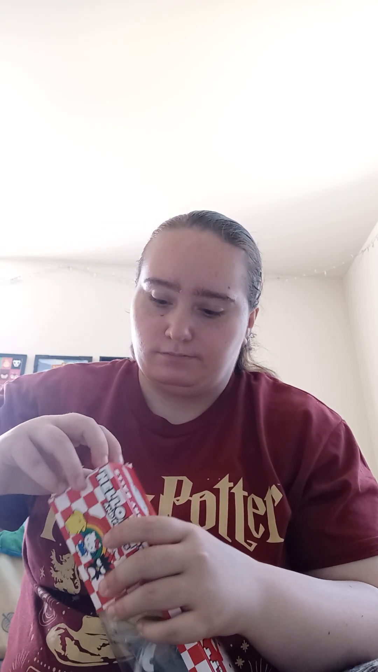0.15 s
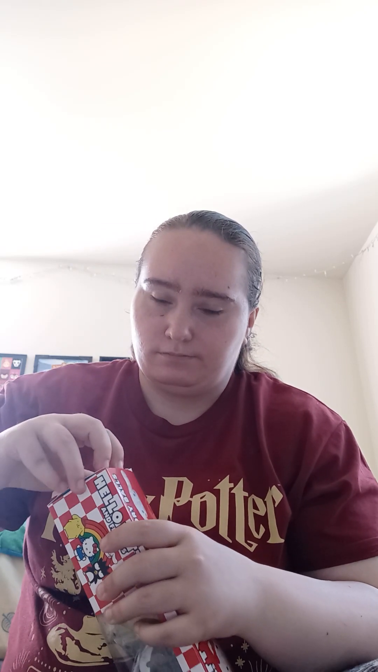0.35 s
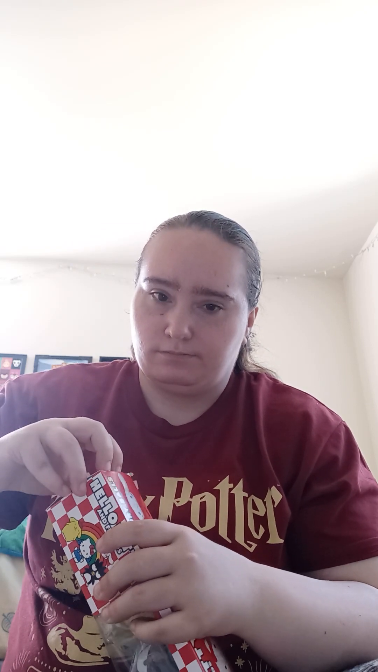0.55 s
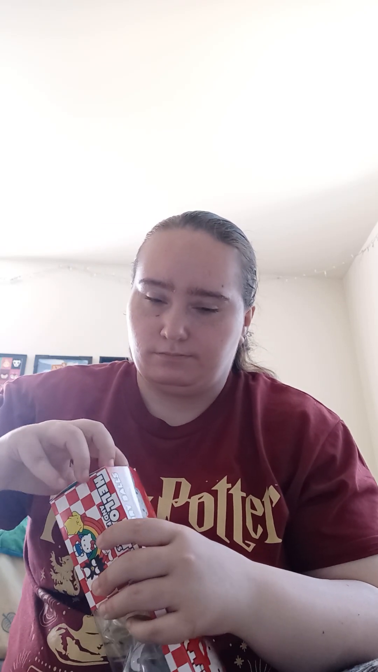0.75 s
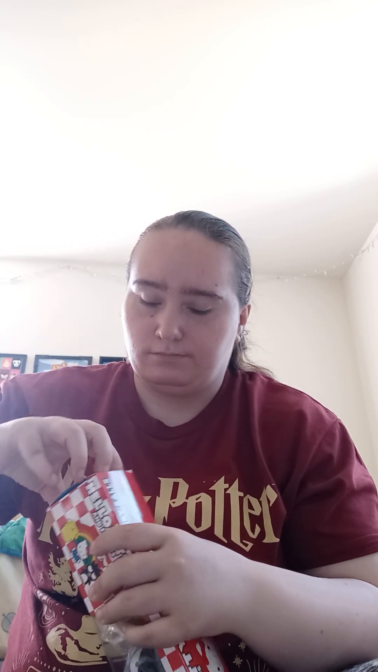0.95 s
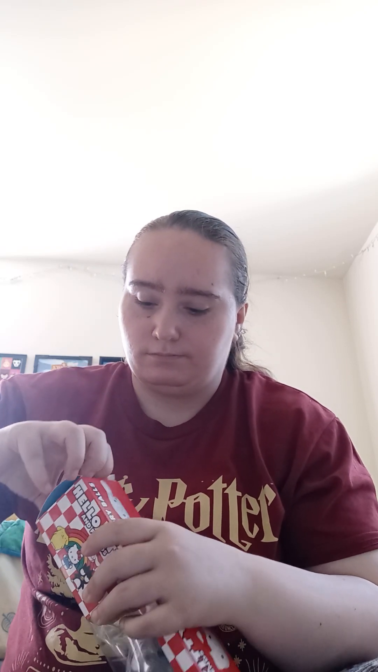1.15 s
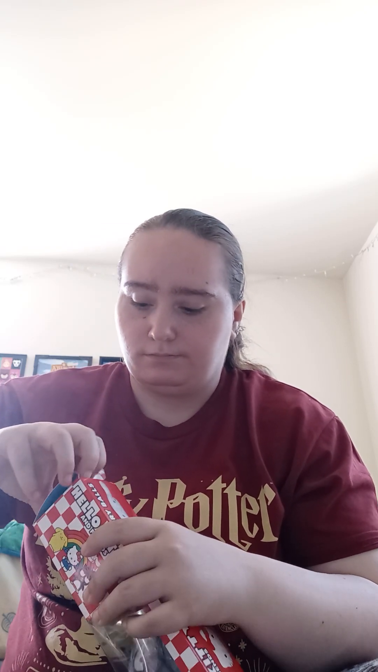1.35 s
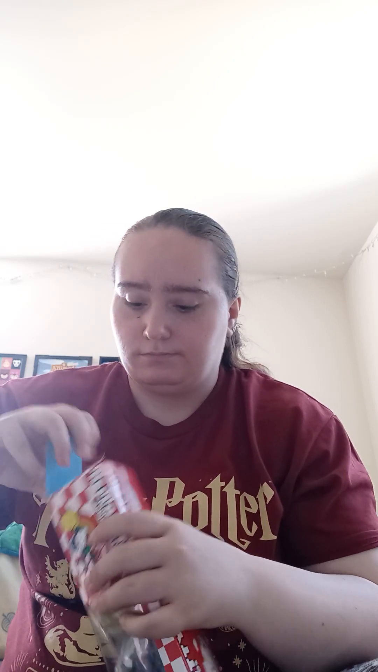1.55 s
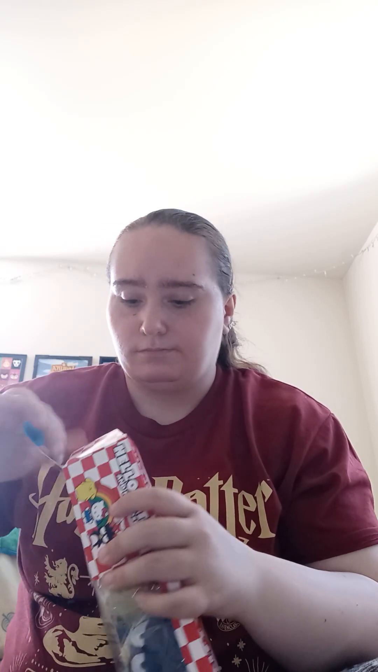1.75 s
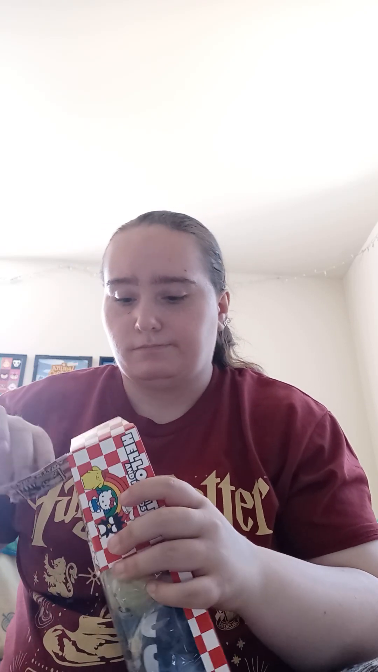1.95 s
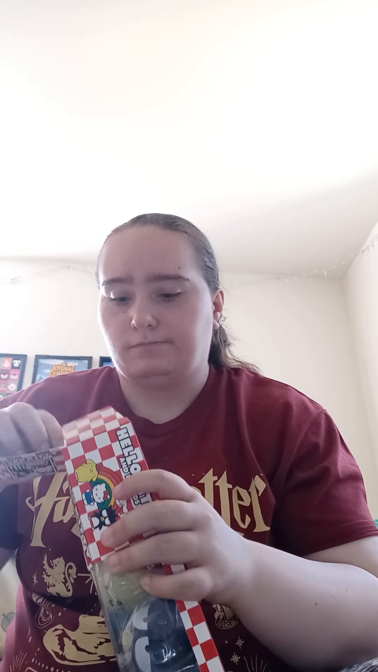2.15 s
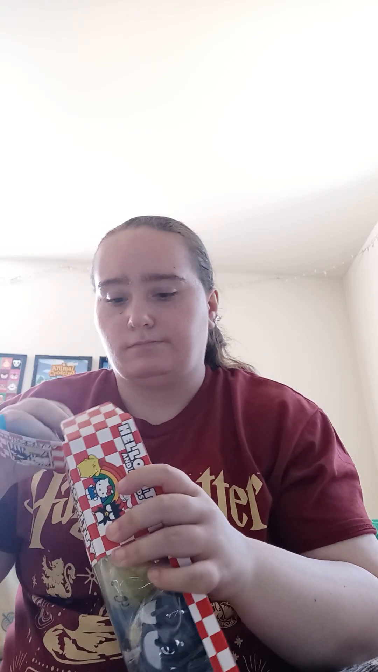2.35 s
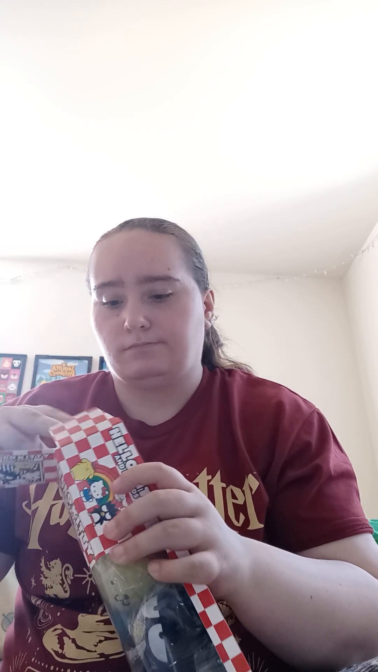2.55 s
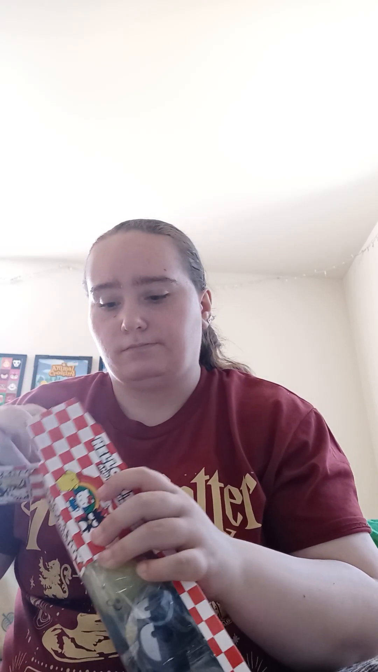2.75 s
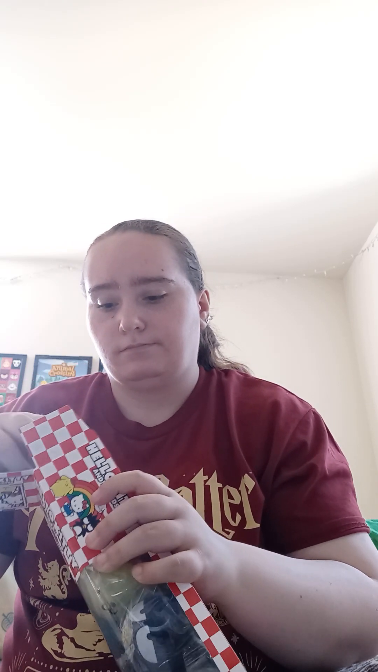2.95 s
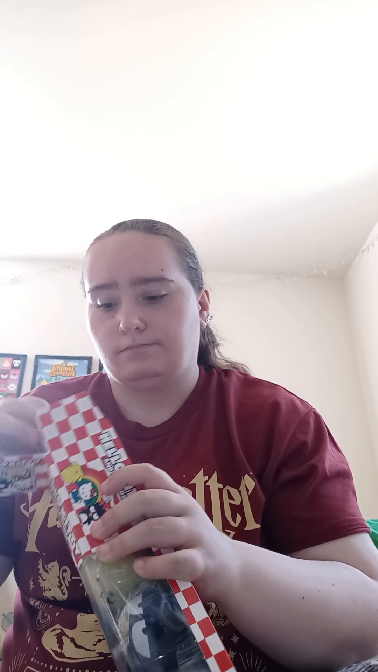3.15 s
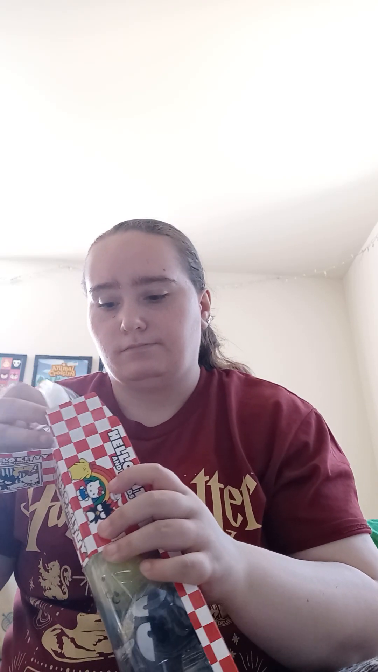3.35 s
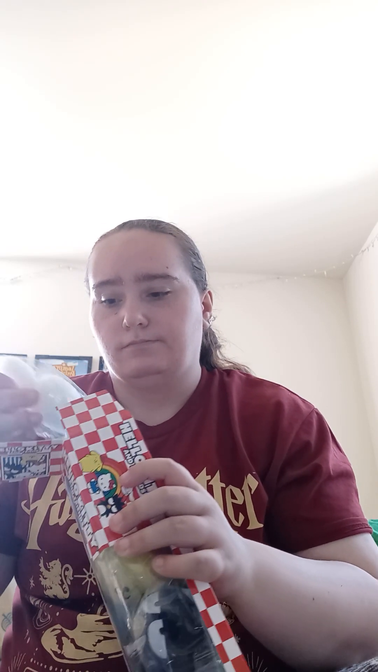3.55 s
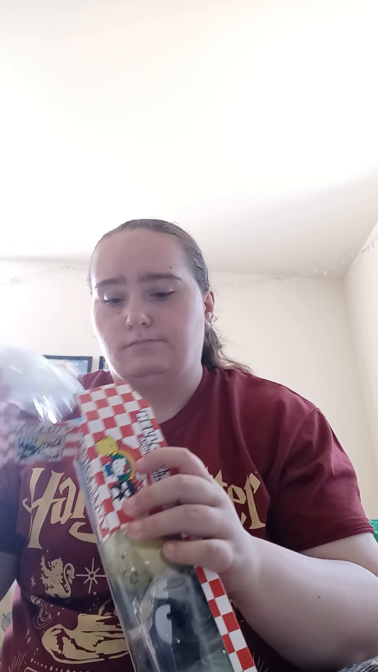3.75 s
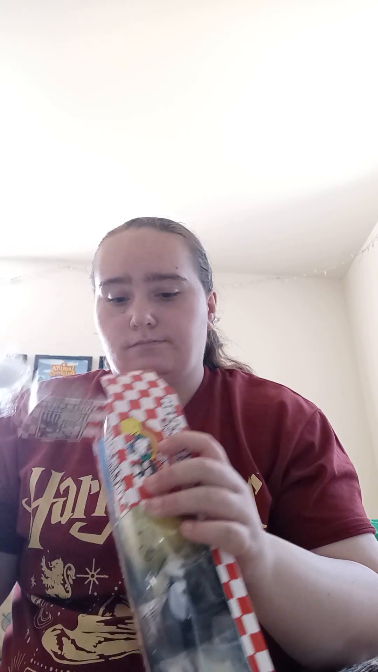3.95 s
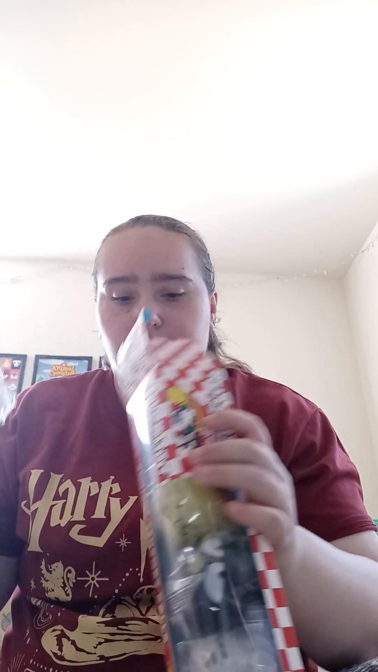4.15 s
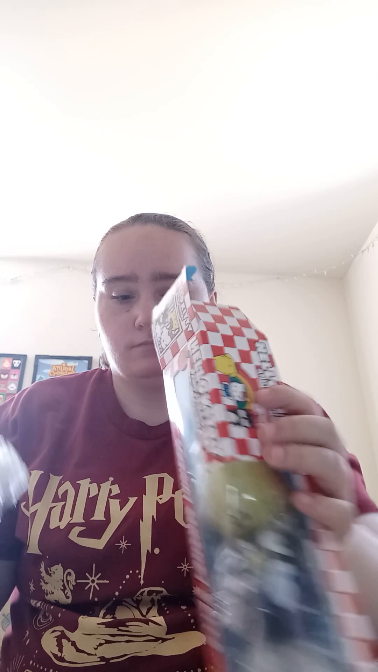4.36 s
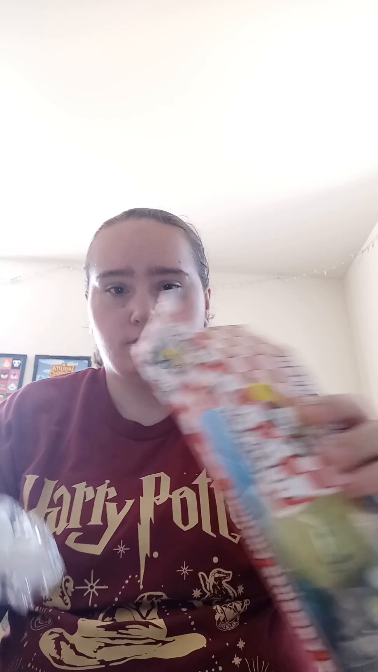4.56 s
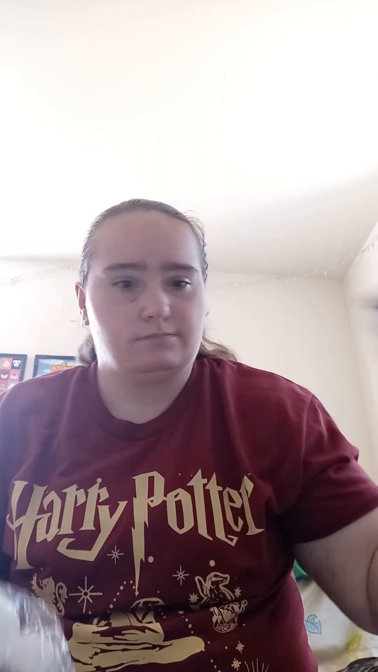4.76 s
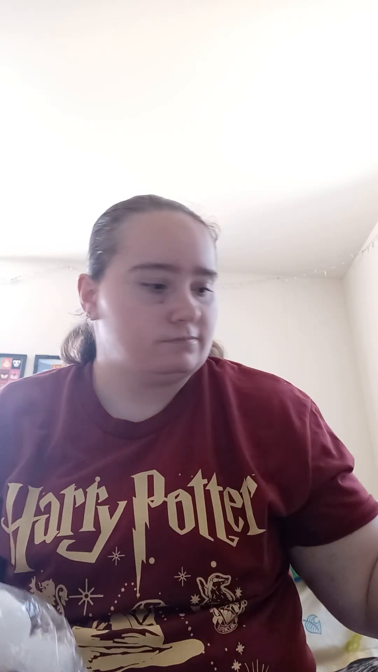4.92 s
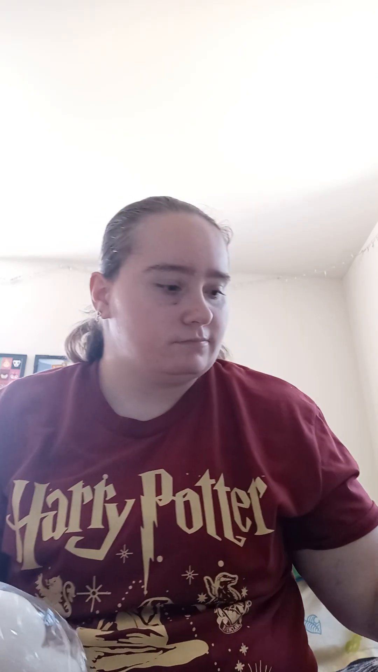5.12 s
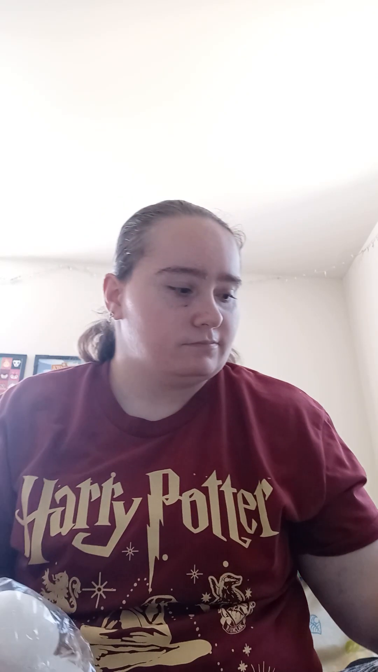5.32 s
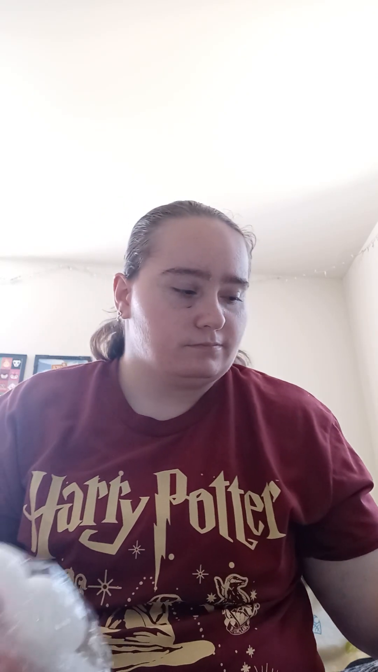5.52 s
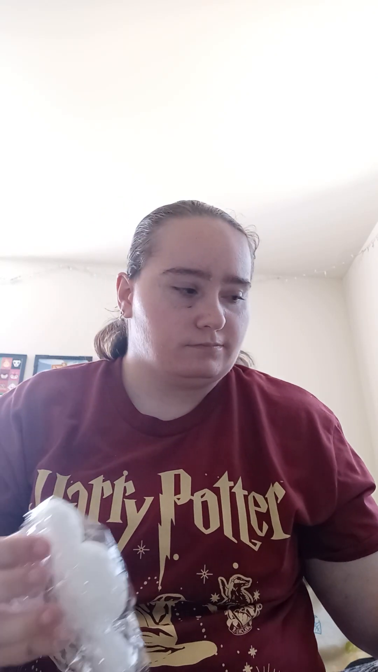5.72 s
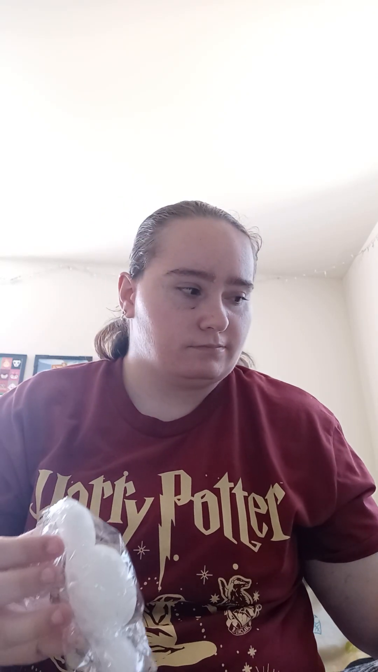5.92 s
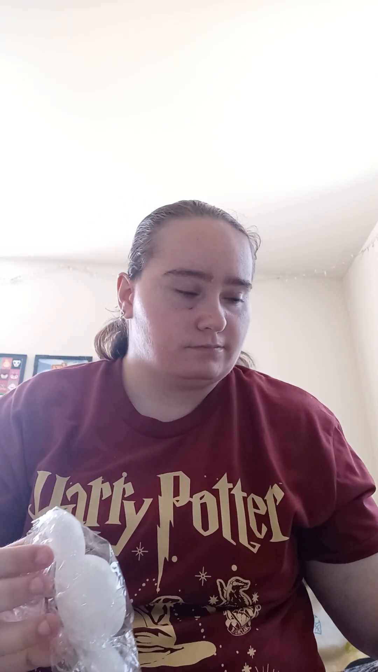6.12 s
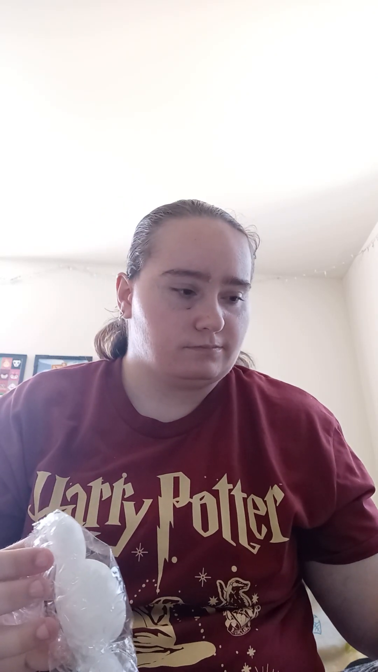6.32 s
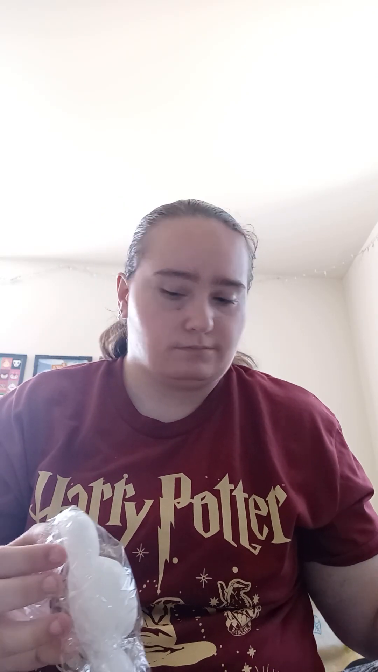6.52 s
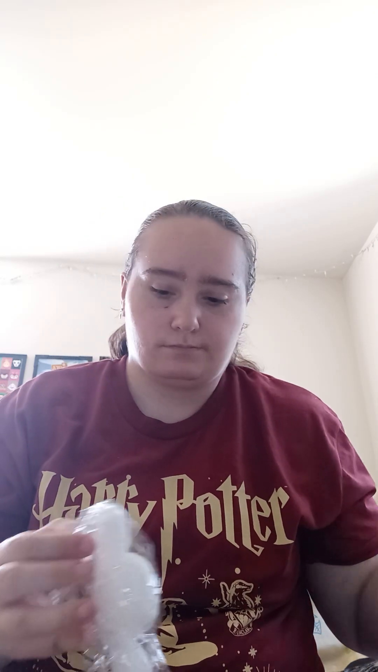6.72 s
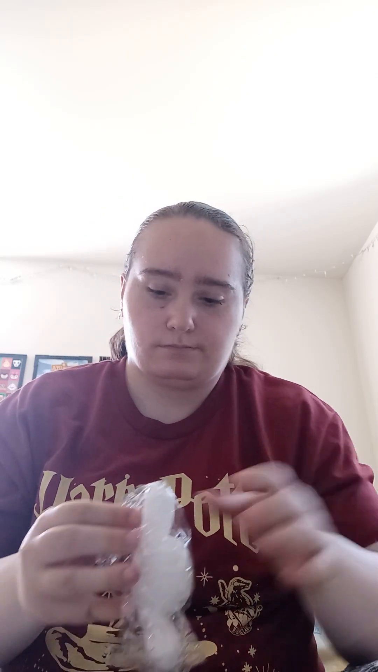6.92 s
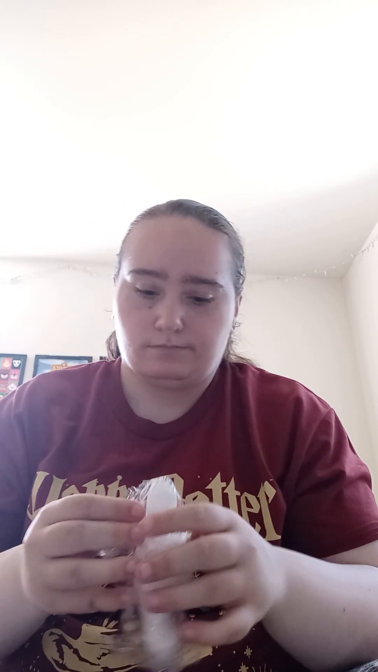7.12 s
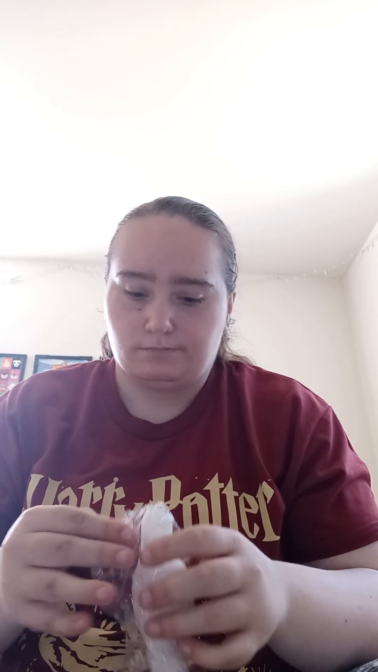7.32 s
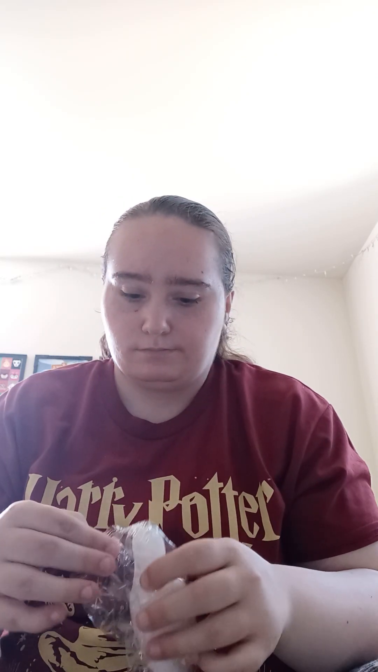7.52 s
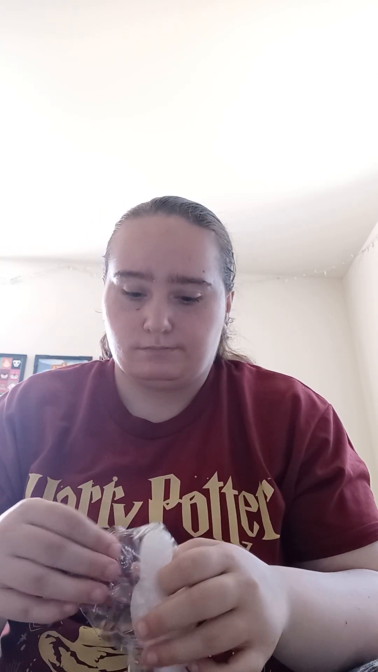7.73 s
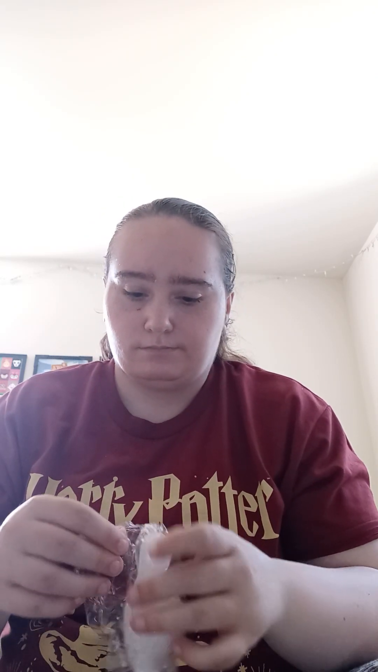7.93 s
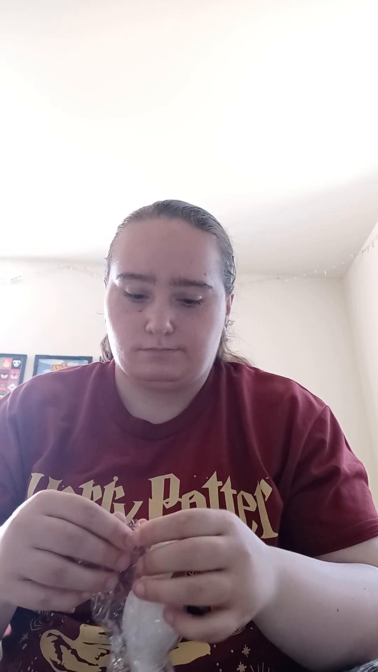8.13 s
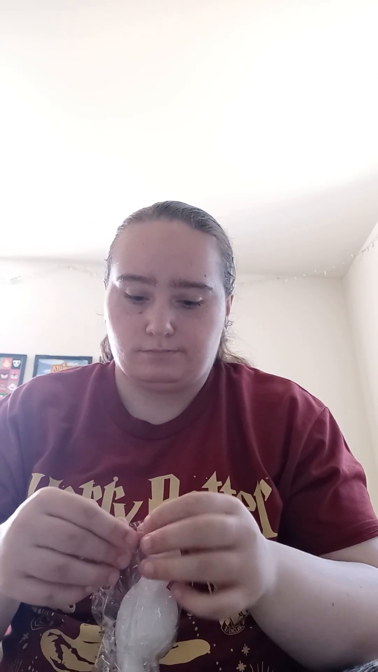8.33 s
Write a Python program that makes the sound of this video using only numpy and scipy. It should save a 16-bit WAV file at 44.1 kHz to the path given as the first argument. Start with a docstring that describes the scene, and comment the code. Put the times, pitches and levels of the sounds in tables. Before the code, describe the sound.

A quiet small room with faint uneven rumble and soft hiss, heard close on a phone microphone. After half a second of near silence, a cardboard flap pops at 0.5, with another firm knock at 0.75. From 1.0 to 1.7 cracks and dry card scrapes come quickly, strongest around 1.5 with a soft hollow thump. Faint sliding follows, then a click and rasp near 2.5 and 2.85. From 3.0 to 4.2 a crisp plastic bag drags out of the box, hissing and crackling with panel shudder, brightest from 3.5, and low bumps around 4.0. Crackle thins after 4.4; from 4.9 to 6.5 only scattered film ticks and a light card knock at 5.66. A sharp snap at 6.6 leads into a buzzy adhesive peel until about 7.1. From 7.2 to the end near 8.4, dense, bright, loud crumpling comes in quick squeezes.

```python
"""Over the faint rumble and hiss of a quiet room, the flaps of a cardboard toy box pop and card slides on card
as it is prised open close to a phone. A toy in a crisp plastic bag is dragged out; the film ticks as it relaxes,
its sticky seal is peeled open, and the bag is crumpled back off the toy. Filtered noise bursts excite resonances
for cracks, thumps and creases; trains of tiny stick-slip catches make the rasp, hiss and panel shudder;
a nearly even train of plucks makes the peel."""
import sys
import numpy as np
from scipy import signal
from scipy.fft import rfft, irfft
from scipy.io import wavfile
from scipy.ndimage import uniform_filter1d, map_coordinates

SR = 44100
rng = np.random.default_rng(int(sys.argv[2]) if len(sys.argv) > 2 else 0)


def store_wav(level_fs):
    """Save 16-bit WAV to argv[1]."""
    pcm = np.round(np.clip(np.atleast_2d(level_fs), -1, 1) * 32767)
    wavfile.write(sys.argv[1], SR, pcm.T.astype(np.int16))


N = 373968
TIME = np.arange(N) / SR
BAG_FREE_S = 4.13  # until then the bag drags on the box

# Spectrum of card fibres giving way. Each row: frequency in Hz, density in dB per Hz.
CARD_SPECTRUM = [(200, -31.5), (900, -15), (1500, -7.5), (2300, 1.5), (3000, -0.5), (3800, 6), (7000, 2),
                 (10000, -8), (16000, -32.5)]
# Spectrum of crisp plastic film. Each row: frequency in Hz, density in dB per Hz.
FILM_SPECTRUM = [(150, -60), (500, -14.5), (1000, -11.5), (1500, -12.5), (2300, -6), (3500, -2.5),
                 (7000, 2), (9500, -7), (12000, -13.5), (16000, -16)]
# Tugs and squeezes of the bag. Each row: start in seconds, length in seconds, relative level in dB,
# flexing of the whole sheet in dB re that level.
BAG_TUGS = [(2.982, .10, -38, -19), (3.067, 0.095, -34, -21.5), (3.181, 0.087, -30, -22.5),
            (3.284, 0.2, -40, -15.5), (3.473, 0.14, -33.5, -37), (3.63, 0.33, -39, -24),
            (3.671, 0.1, -34, -45), (3.873, 0.068, -30, -34), (3.948, 0.16, -36.5, -43),
            (4.149, 0.12, -49.5, -19), (4.338, 0.045, -43, -17), (4.46, 0.16, -66.5, -26),
            (4.846, 0.091, -59.5, -11), (4.908, 0.19, -58.5, -15), (5.27, 0.18, -71.5, -15),
            (5.645, 0.24, -61, -14.5), (6.465, 0.18, -63, -33), (6.553, 0.085, -51, -9),
            (6.686, 0.373, -43, -33), (7.045, 0.19, -45.5, -46), (7.199, 0.073, -34.5, -19),
            (7.28, .19, -37, -21), (7.328, 0.023, -23.5, -27.5), (7.459, 0.061, -26, -23.5),
            (7.509, 0.16, -28, -22.5), (7.686, 0.057, -26, -35), (7.765, 0.075, -28.5, -22),
            (7.8, 0.076, -23.5, -28), (7.908, 0.086, -27, -25), (8.046, 0.058, -35.5, -18.5),
            (8.135, 0.054, -35.5, -24), (8.193, 0.096, -28.5, -33), (8.298, 0.055, -25, -29.5),
            (8.407, 0.037, -33.5, -27)]


def undb(db):
    """Decibels express an amplitude ratio on a logarithmic scale; this inverts it."""
    return 10 ** (np.asarray(db) / 20)


def unit(x):
    """Normalise the mean power: scale to rms 1."""
    return x / np.sqrt(np.mean(x ** 2))


def curve(table, axis):
    """Linear interpolation: one column of a table joined by straight lines in time."""
    rows = np.array(table, float)
    return np.interp(TIME, rows[:, 0], rows[:, axis])


def colour(x, spectrum):
    """Minimum-phase filtering: the folded cepstrum gives a causal filter of this (Hz, dB) spectrum."""
    n = x.shape[-1]
    hz, db = np.transpose(spectrum)
    log_hz = np.log(np.fft.rfftfreq(n, 1 / SR) + 1)
    gain = undb(np.interp(log_hz, np.log(hz), db))
    cepstrum = irfft(np.log(gain), n)
    cepstrum[1:n // 2] *= 2
    cepstrum[n // 2 + 1:] = 0
    return irfft(rfft(x) * np.exp(rfft(cepstrum)), n)


def resonate(x, hz, width):
    """Damped resonance: a band of the given width in Hz, gain 1 at its centre."""
    f = np.fft.rfftfreq(x.shape[-1], 1 / SR) + 1e-6
    detuning = (f * f - hz * hz) / (f * width)
    return irfft(rfft(x) / (1 + 1j * detuning), x.shape[-1])


def bursts(decay_s, count, size):
    """Impulsive excitation: rows of noise that start at once and die away exponentially."""
    return rng.standard_normal((count, size)) * np.exp(-np.arange(size) / SR / decay_s)


def place(times, gains, rows):
    """Superposition of events of set energy; gain 1 is the energy of full scale for a millisecond."""
    out = np.zeros(N + rows.shape[1])
    rows = rows * np.sqrt(SR / 1000 / np.sum(rows ** 2, axis=1, keepdims=True))
    starts = np.clip(np.asarray(times) * SR, 0, N - 1).astype(int)
    for i, gain, row in zip(starts, gains, rows):
        out[i:i + len(row)] += gain * row
    return out[:N]


def steady(x, span_s):
    """Power levelling: hold the short-term rms of a grain stream near 1."""
    window = max(int(span_s * SR), 2)
    power = uniform_filter1d(uniform_filter1d(x ** 2, window), window)
    return x / np.sqrt(np.abs(power) + np.mean(x ** 2) / 20)


def friction(rate, spread_db):
    """Stick-slip friction: tiny catches of unequal size between two sliding surfaces."""
    happens = rng.random(N) < rate / SR
    catches = happens * rng.standard_normal(N) * undb(spread_db * rng.standard_normal(N))
    return steady(catches, span_s=0.07)


def patchy(x, depth_db, rate):
    """Shifting modal excitation: a moving contact favours other resonances from moment to moment."""
    hz, s, frames = signal.stft(x, SR, nperseg=512)
    places = np.meshgrid(np.sqrt(hz) / 4, s * rate, indexing="ij")
    field = map_coordinates(rng.standard_normal((48, 400)), places, order=1, mode="mirror")
    return unit(signal.istft(frames * undb(depth_db * field), SR)[1][:N])


def strokes(table, db, attack_s, release_s):
    """Power addition of hand movements (start, length): each swells, holds and dies away."""
    t = TIME[::32]
    start, length = np.array(table).T[:2, :, None]
    swell = np.clip((t - start) / attack_s, 0, 1) ** 2
    release = np.exp(-np.maximum(t - start - length, 0) / release_s)
    return np.interp(TIME, t, np.linalg.norm(undb(db)[:, None] * swell * release, axis=0))


def room_air():
    """Broadband ambient noise: faint, uneven rumble and steady hiss of the quiet room."""
    # Each row: frequency in Hz, density in dB per Hz.
    air_spectrum = [(32, -19), (55, -1), (80, -3), (110, -1.5), (200, -8.5), (330, -12), (600, -19.5),
                    (1200, -23.5), (1900, -22.5), (3300, -27.5), (5300, -27), (7000, -28.5), (16000, -32)]
    air = unit(colour(rng.standard_normal(N), air_spectrum))
    swell = np.interp(TIME, np.linspace(0, TIME[-1], 110), rng.standard_normal(110))
    rumble = .75 * swell * resonate(air, 70, 90)
    return undb(-71) * (air + rumble)


def room(x):
    """Reflection and reverberation: a near surface answers, and a diffuse tail loses its treble sooner."""
    room_db, echo_s, echo_db = -15.5, 0.0099, -16
    low_t60_s, treble_t60_s = .33, .25
    t = TIME[:SR // 2]
    noise = rng.standard_normal(len(t))
    low = resonate(noise, 2400, 4000)
    tail = low * undb(-60 * t / low_t60_s) + 0.74 * (noise - low) * undb(-60 * t / treble_t60_s)
    tail *= np.clip(t / 0.0019, 0, 1)
    echo = rng.standard_normal(len(t)) * (t > echo_s) * np.exp(-np.abs(t - echo_s) / 0.0044)
    response = undb(room_db) * tail / np.linalg.norm(tail)
    response = response + undb(echo_db) * echo / np.linalg.norm(echo)
    # low sound spreads all round and feeds the room more than the treble does
    feed = x + 0.24 * resonate(x, 310, 2400)
    return x + signal.fftconvolve(feed, response)[:N]


def thumps():
    """Cavity resonance: contents bumping about inside the box move only the air in it, soft and heavy."""
    # Each row: time in seconds, energy in dB re full scale for 1 ms, frequency in Hz.
    bumps = [(1.488, -28.5, 224), (1.521, -44.5, 110), (2.849, -42.5, 65), (3.101, -55, 66),
             (3.899, -37, 90), (3.96, -33.5, 100), (4.027, -36, 121), (4.109, -40, 215), (4.219, -49, 100)]
    s, db, hz = np.transpose(bumps)
    push = bursts(decay_s=0.03, count=len(s), size=8192)
    bump = resonate(push, hz[:, None], 90)
    return place(s, undb(db), resonate(bump, 165, 220))


def panels(x):
    """Modal superposition: the ring of the box, its modes summed with alternating sign."""
    # Each row: frequency in Hz, width in Hz, gain in dB.
    box_modes = [(225, 110, -10.5), (363, 30, 3), (506, 150, -1), (835, 41, 4), (1000, 123, 0),
                 (1335, 57, 6)]
    return sum((-1) ** k * undb(db) * resonate(x, hz, width) for k, (hz, width, db) in enumerate(box_modes))


def sliding_card():
    """Stick-slip: card fibres rasp, a cut edge scrapes brighter and panels shudder, also under the dragged bag."""
    # Strokes of card on card. Each row: start in seconds, length in seconds, relative level in dB,
    # cut edge in dB re the rasp, panel shudder in dB re the level.
    slides = [(0.505, 0.063, -59, -1.5, -7), (0.799, 0.068, -48, -8.5, -11.5),
              (1.012, 0.17, -47.5, -3.5, -16.5), (1.143, 0.081, -38, 8.5, -14),
              (1.245, 0.18, -40.5, -7, -7), (1.431, 0.094, -32, -0.5, -12),
              (1.623, 0.027, -32.5, -7.5, -9.5), (1.75, 0.18, -57.5, 1, -20), (1.937, 0.085, -55, 12.5, -9),
              (2.065, 0.038, -45, 4.5, -11.5), (2.127, 0.064, -57, 2, -3.5),
              (2.237, 0.15, -53.5, -3, -11.5), (2.375, .115, -54, -11, -28), (2.476, 0.081, -37, -17, -30),
              (2.56, 0.14, -48.5, -7.5, -6), (2.68, 0.099, -56, -1, -29),
              (2.817, 0.099, -40.5, -12.5, -14.5), (3.95, 0.11, -46, -15, 1), (4.459, 0.037, -48.5, -7, -8),
              (5.46, 0.098, -60.5, -7, -5), (5.516, 0.065, -49, -1, -8)]
    # Scrape of a cut edge. Each row: frequency in Hz, density in dB per Hz.
    edge_spectrum = [(2000, -22.5), (4000, 2.5), (5500, -0.5), (7000, 0), (10000, -11.5), (16000, -17)]
    attack_s, release_s = .024, 0.03
    catches_per_s, catch_db = 41, -14  # fibres that snag and let go with a tick
    flutter_db = 3.5  # the hand never slides the card evenly
    drag_panel_db = -21  # panel shudder re the level of the tug
    _, _, db, edge_db, panel_db = np.transpose(slides)
    push = strokes(slides, db, attack_s, release_s)
    edge_push = strokes(slides, db + edge_db, attack_s, release_s)
    shake = strokes(slides, db + panel_db, attack_s, release_s)
    dragged = np.array([tug for tug in BAG_TUGS if tug[0] < BAG_FREE_S])
    drag = strokes(dragged, dragged[:, 2] + drag_panel_db, attack_s, release_s)

    rasp = patchy(colour(friction(rate=4000, spread_db=3), CARD_SPECTRUM), depth_db=6, rate=26)
    edge = patchy(colour(friction(rate=6000, spread_db=3), edge_spectrum), depth_db=4, rate=26)
    scrape = steady(rasp + edge_push / (push + 1e-12) * edge, span_s=.1)
    ticks = (rng.random(N) < catches_per_s / SR) * rng.standard_normal(N)
    snags = unit(colour(ticks, CARD_SPECTRUM))
    shudder = colour(panels(friction(rate=600, spread_db=4)), [(650, 0), (1300, -7)])
    shudder = steady(patchy(shudder, depth_db=7, rate=16), span_s=.05)
    wander = np.interp(TIME, np.linspace(0, TIME[-1], 300), rng.standard_normal(300))
    contact = (scrape + undb(catch_db) * snags) * push * undb(flutter_db * wander)
    return undb(-1.5) * contact + undb(-3.0) * shudder * np.hypot(shake, drag)


def knocks():
    """Impulsive modal excitation: a crack rings the panels, and the place struck favours some modes."""
    # Flaps popping and fingers striking the box. Each row: time in seconds, crack energy in dB re full scale
    # for 1 ms, crack frequency in Hz, panel energy in dB re the same, panel frequency in Hz.
    strikes = [(0.492, -42, 4380, -60, 380), (0.5374, -27, 2160, -27.5, 315), (0.7102, -39, 5960, -55, 800),
               (0.7379, -18.5, 2130, -24.5, 713), (0.8562, -33, 4270, -43.5, 870),
               (1.0556, -31, 6200, -41.5, 1200), (1.0879, -28, 5140, -45, 1100),
               (1.1394, -19.5, 7500, -41, 1010), (1.2307, -23, 5200, -39, 900),
               (1.2982, -22, 2350, -31.5, 1100), (1.3922, -18.5, 3040, -17, 750),
               (1.4826, -10.5, 4240, -26, 540), (1.5313, -14, 4740, -53, 530),
               (1.5787, -25, 6060, -47, 570), (1.642, -17.5, 5150, -25, 795), (1.766, -28, 7900, -61, 398),
               (1.8805, -34, 4070, -65, 395), (2.511, -25, 4200, -70, 440), (2.5629, -25.5, 4100, -53, 440),
               (2.849, -25.5, 3100, -38, 900), (3.2558, -20, 5000, -26.5, 620),
               (4.0503, -28, 5670, -31, 476), (4.11, -37, 3600, -25.5, 606),
               (5.6622, -33.5, 3980, -36, 756)]
    flap_ring_db, flap_width_hz, big_flap_hz = 3.5, 230, 2250
    s, crack_db, crack_hz, panel_db, panel_hz = np.transpose(strikes)
    crack_hz, panel_hz = crack_hz[:, None], panel_hz[:, None]
    crack = colour(bursts(decay_s=.0015, count=len(s), size=2048), CARD_SPECTRUM)
    crack = resonate(crack, crack_hz, .55 * crack_hz)
    # a flap rings briefly at the centre of its crack, a big low one most
    flap_gain = undb(flap_ring_db) * (big_flap_hz / crack_hz) ** 2
    crack = crack + flap_gain * resonate(crack, crack_hz, flap_width_hz)
    push = bursts(decay_s=.0008, count=len(s), size=2048)
    thud = resonate(panels(push) + .5 * push, panel_hz, .55 * panel_hz)
    # the fibres creak for an instant before they give way
    creak = colour(bursts(decay_s=.008, count=len(s), size=1024)[:, ::-1], CARD_SPECTRUM)
    sound = place(s, undb(crack_db), crack) + place(s, undb(panel_db), thud)
    return sound + undb(-25) * place(s - creak.shape[1] / SR, undb(crack_db), creak)


def peel():
    """Stick-slip of glue: a quick, nearly even train of slips plucks the taut film and its loose flap."""
    # The pull on the seal. Each row: time in seconds, slips per second, flap resonance in Hz, relative level in dB.
    pull = [(6.655, 125, 1700, -34.5), (6.72, 114, 1220, -27), (6.83, 156, 1380, -42),
            (6.9, 130, 1830, -32), (7.02, 84, 2220, -30.5), (7.18, 54, 2216, -52)]
    # Each row: frequency in Hz, density in dB per Hz.
    seal_spectrum = [(300, -58), (650, -51), (1000, -1.5), (1700, -5.5), (3600, -3.5), (5600, 0),
                     (6700, 13.5), (8000, -1.5), (11000, -17), (16000, -22)]
    turns = np.cumsum(curve(pull, axis=1) * (TIME > pull[0][0])) / SR
    chance = rng.standard_normal((90, 2))
    # a slip at each whole turn, give or take a little
    s = np.interp(np.arange(len(chance)) + 1 + .17 * chance[:, 0], turns, TIME)
    pluck = colour(bursts(decay_s=.0005, count=len(s), size=512), seal_spectrum)
    flap_hz = np.interp(s, TIME, curve(pull, axis=2))[:, None]
    slip_db = np.interp(s, TIME, curve(pull, axis=3)) + 2.2 * chance[:, 1]
    sizes = undb(slip_db) * (s < pull[-1][0])
    # the flap radiates little below its own resonance
    sound = pluck - 0.98 * resonate(pluck, 0.56 * flap_hz, 1.3 * flap_hz)
    sound = sound + 0.16 * resonate(pluck, flap_hz, 500)
    return undb(5.0) * place(s, sizes, sound)


def creases(hz, decay_s, width):
    """Snap-through buckling in two quick steps rings a facet of film: a broad centre and brief modes."""
    kick = bursts(decay_s, count=len(hz), size=512)
    lag = SR * rng.uniform(.0005, .0025, (len(hz), 1))  # samples
    later = np.arange(512) - lag
    second = rng.standard_normal(kick.shape) * (later > 0) * np.exp(-np.abs(later) / SR / decay_s)
    clicks = colour(kick + .8 * rng.random(lag.shape) * second, FILM_SPECTRUM)
    centre = hz[:, None]
    facet = 0
    for ratio in (.5, .8, 1.3):
        mode_hz = centre * ratio * 2 ** (.25 * rng.standard_normal(centre.shape))
        facet = facet + resonate(clicks, mode_hz, 520)
    return resonate(clicks, centre, width * centre) + .75 * facet


def snaps():
    """Snap-through instability: the big creases of the bag that stand out one by one, and the loudest slips of
    the peeling seal."""
    # Each row: time in seconds, relative energy in dB, centre frequency in Hz. The rows from 6.78 to 7.07 s are
    # the loudest slips of the peeling seal.
    big_creases = [(2.963, -37, 3520), (2.995, -25, 4800), (3.0528, -25, 3880), (3.2367, -23.5, 4900),
                   (3.2655, -22, 7360), (3.4325, -30, 5900), (3.478, -14, 5400), (3.5561, -16.5, 4900),
                   (3.6559, -16.5, 5400), (3.7014, -19, 5500), (3.735, -16, 5400), (3.919, -13, 7400),
                   (3.978, -15.5, 5950), (4.0333, -16, 5000), (4.0798, -17, 8200), (4.1862, -26.5, 5950),
                   (4.2986, -30.5, 4930), (4.3117, -24.5, 6900), (4.3519, -18, 5530), (4.4006, -19.5, 7560),
                   (4.5447, -34.5, 4300), (4.664, -39, 3880), (4.752, -50.5, 6230), (4.9123, -21, 6460),
                   (4.923, -17, 5200), (4.9788, -33, 8500), (5.065, -31.5, 4190), (5.083, -32, 5670),
                   (5.142, -24.5, 5600), (5.2675, -24.5, 5130), (5.3304, -35, 5070), (5.3543, -36, 3000),
                   (5.4069, -32, 5400), (5.675, -24.5, 6950), (5.729, -23.5, 3270), (5.7521, -22, 8200),
                   (5.785, -37.5, 3430), (5.8368, -28, 5200), (5.846, -19, 7340), (5.8825, -25.5, 5400),
                   (5.9854, -30.5, 4940), (6.0477, -21, 5270), (6.2558, -41, 6550), (6.268, -30.5, 3670),
                   (6.4484, -47, 7500), (6.573, -36, 5940), (6.5865, -15, 7600), (6.7855, -18, 6360),
                   (6.864, -21, 6000), (6.969, -20, 7150), (7.0608, -22.5, 7340), (7.123, -24.5, 7400),
                   (7.133, -29, 7650), (7.1773, -19.5, 6900), (7.1946, -17.5, 6500), (7.292, -16.5, 4600),
                   (7.3188, -26, 6200), (7.445, -13, 7200), (7.6131, -13, 4040), (7.6681, -11, 6070),
                   (7.7321, -10, 7400), (7.795, -15, 4500), (7.8833, -13, 6800), (8.0613, -14.5, 6140),
                   (8.133, -17.5, 7000), (8.2548, -25, 5750), (8.316, -22, 6460), (8.4182, -16, 5530)]
    # Big creases are brighter than the swarm. Each row: frequency in Hz, gain in dB.
    snap_tilt = [(500, -0.5), (1800, 1), (4500, 2), (9000, 1.5), (14000, 2)]
    s, db, hz = np.transpose(big_creases)
    sound = colour(creases(hz, decay_s=.0005, width=.9), snap_tilt)
    return undb(.6) * place(s, undb(db), sound)


def crinkle():
    """Crackling noise: tugs set off swarms of small buckles, film hissing on film and dull flexing of the sheet."""
    # Film sliding on film is duller. Each row: frequency in Hz, gain in dB.
    hiss_tilt = [(1500, 0), (4000, 2.5), (8000, 1), (13000, -5)]
    attack_s, release_s = 0.013, 0.02
    # a harder tug buckles more creases: rate at a firm tug's level, and the rise in level that doubles it
    creases_per_s, firm_tug_db, doubling_db = 290, -26.5, 22.5
    crease_hz, crease_spread_db = 6280, 5
    # dragging on the box the bag hisses more and creases less (dB re the level of the tug)
    hiss_db = np.where(TIME < BAG_FREE_S, -2, -11.5)
    swarm_db = np.where(TIME < BAG_FREE_S, -3.5, -0.5)
    _, _, db, flex_db = np.transpose(BAG_TUGS)
    effort = strokes(BAG_TUGS, db, attack_s, release_s)
    bending = strokes(BAG_TUGS, db + flex_db, attack_s, release_s)
    rate = creases_per_s * 2 ** ((20 * np.log10(effort + 1e-4) - firm_tug_db) / doubling_db)

    # candidate creases, thinned to follow the rate
    chance = rng.standard_normal((2800, 2))
    start, end = BAG_TUGS[0][0], TIME[-1]
    s = start + (end - start) * rng.random(len(chance))
    buckles = rng.random(len(s)) < np.interp(s, TIME, rate) * (end - start) / len(s)
    sizes = undb(crease_spread_db * np.minimum(chance[:, 0], 1.5)) * buckles
    swarm = place(s, sizes, creases(crease_hz * 2 ** (.65 * chance[:, 1]), decay_s=.00055, width=.8))
    swarm = steady(patchy(swarm, depth_db=3, rate=24), span_s=.035)

    hiss = colour(colour(friction(rate=1600, spread_db=5), FILM_SPECTRUM), hiss_tilt)
    hiss = patchy(hiss, depth_db=5, rate=30)
    flexing = resonate(bursts(decay_s=0.0022, count=len(s), size=512), 580, 700)
    flexing = resonate(flexing, 700, 1000)
    flex = steady(patchy(place(s, sizes, flexing), depth_db=5, rate=20), span_s=.04)
    return effort * (undb(swarm_db) * swarm + undb(hiss_db) * hiss) + bending * flex


def scene():
    """Linear superposition: box and bag sound in the room, over its air."""
    handling = knocks() + sliding_card() + thumps() + snaps() + crinkle() + peel()
    return (room(handling) + room_air())[None]


def record(dry):
    """Port resonance and saturation: the phone's port hollows 5 kHz, high peaks are rounded, the top is cut."""
    # Each row: frequency in Hz, gain in dB.
    port_response = [(3600, 2.5), (4400, 3.5), (5100, -8), (5700, -6), (6700, 0.5), (7700, -0.5), (9000, 4)]
    top_hz = 15900
    padded = np.pad(dry, ((0, 0), (0, 2 ** 19 - N)))
    sound = colour(padded, port_response)[:, :N]
    sound = .75 * np.tanh(sound / .75)
    return signal.sosfilt(signal.ellip(10, .2, 75, top_hz, fs=SR, output="sos"), sound)


dry = scene()
out = record(dry)
store_wav(out)
```